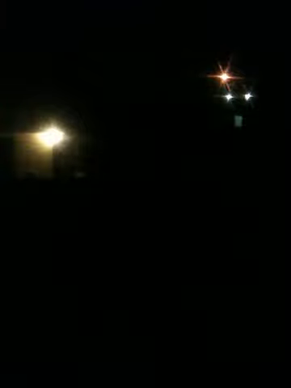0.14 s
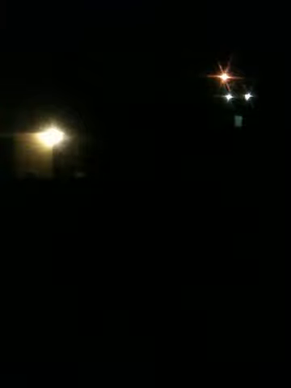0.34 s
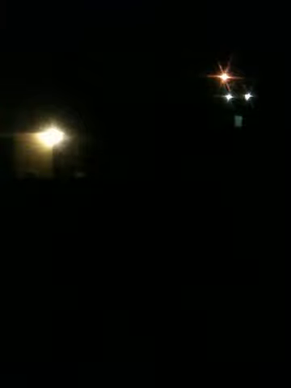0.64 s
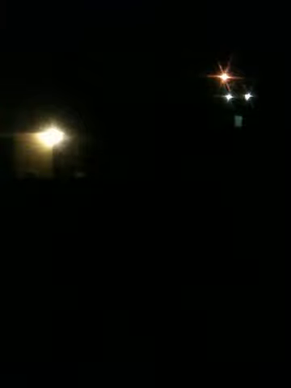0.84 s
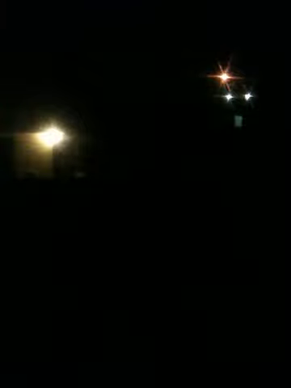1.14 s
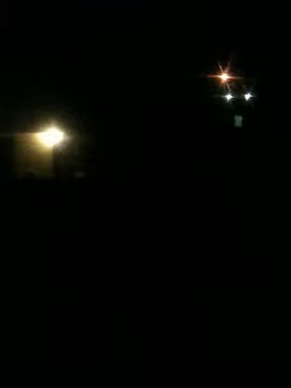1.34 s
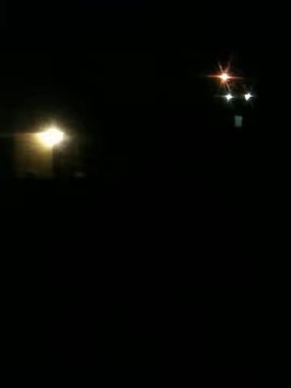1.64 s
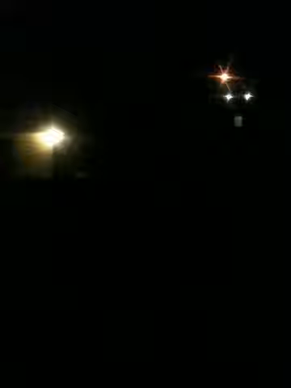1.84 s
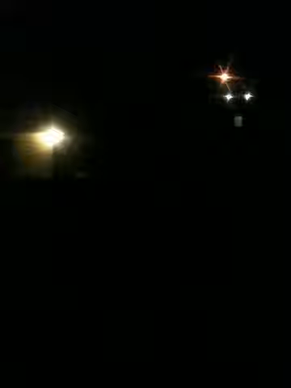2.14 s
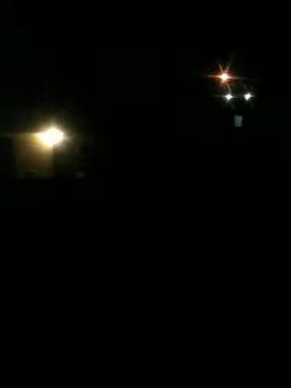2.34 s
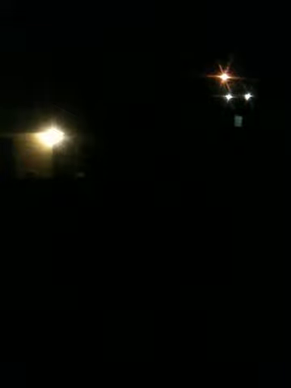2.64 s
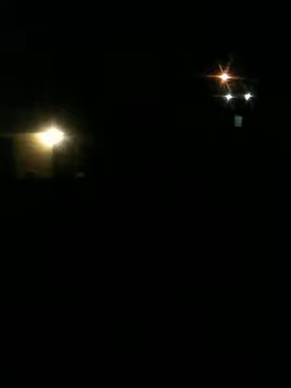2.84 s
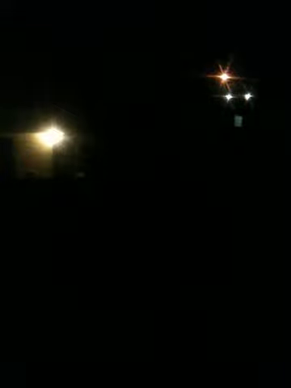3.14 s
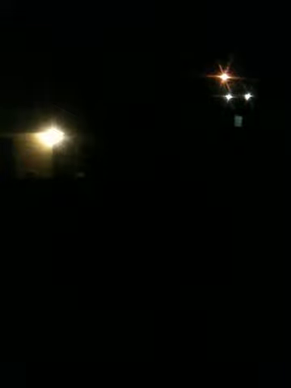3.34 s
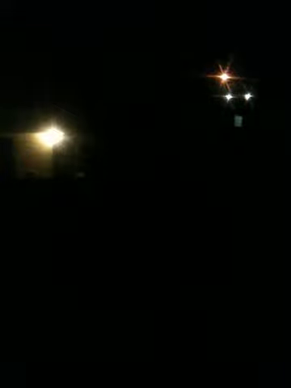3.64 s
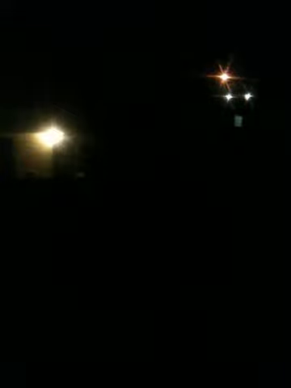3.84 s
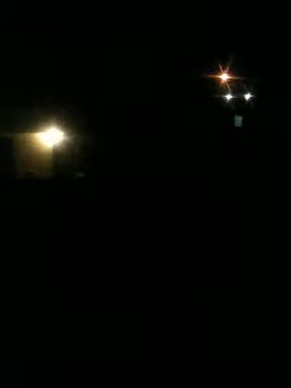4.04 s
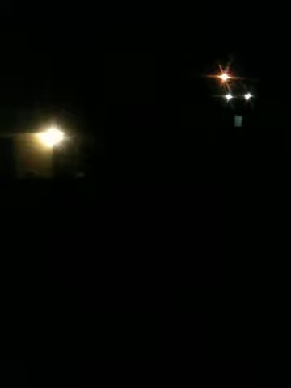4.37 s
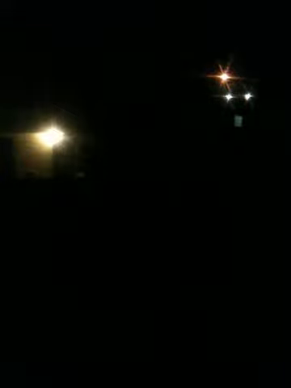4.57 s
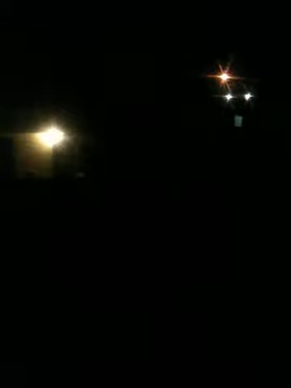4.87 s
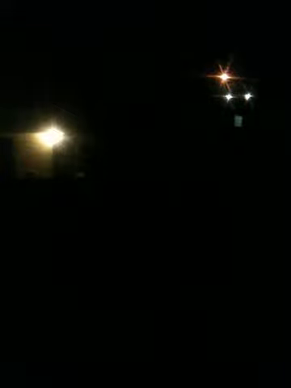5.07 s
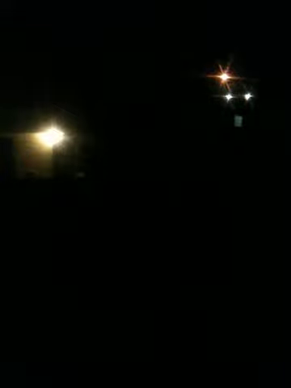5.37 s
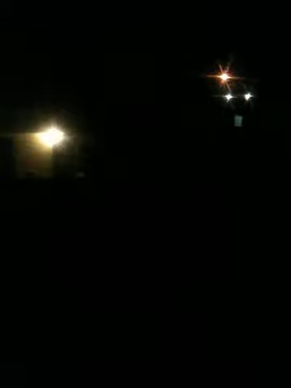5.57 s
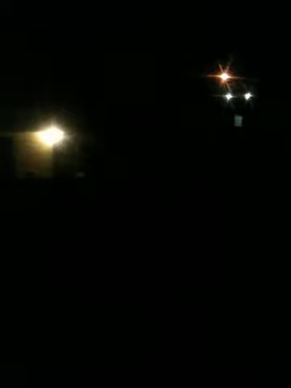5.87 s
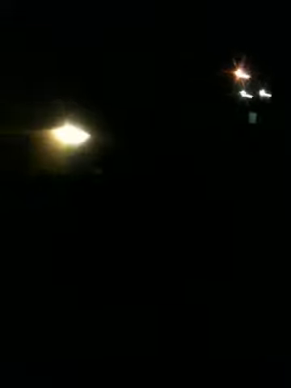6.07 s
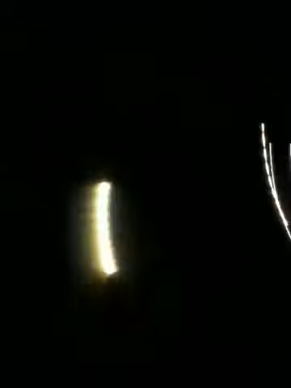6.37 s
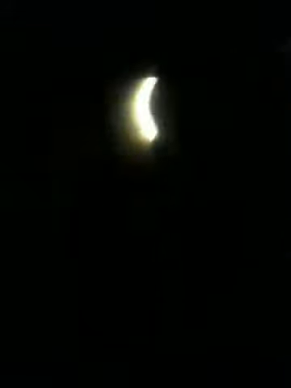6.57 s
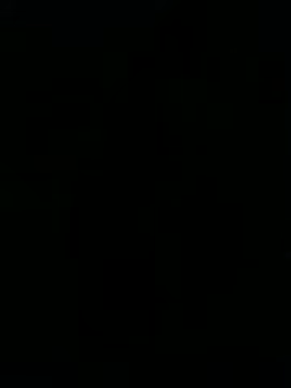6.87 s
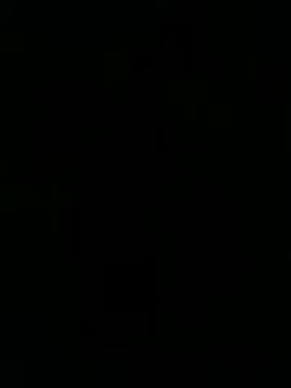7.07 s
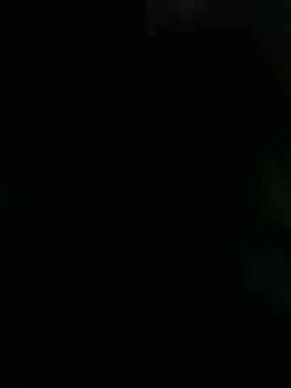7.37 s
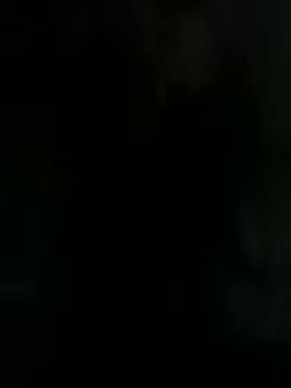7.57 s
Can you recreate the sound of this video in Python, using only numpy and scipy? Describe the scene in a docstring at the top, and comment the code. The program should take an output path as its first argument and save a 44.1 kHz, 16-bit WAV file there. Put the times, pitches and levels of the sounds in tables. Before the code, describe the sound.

Quiet night ambience with a low distant traffic drone, a thin insect chorus and a barely audible high whine. A bird's clear, quick whistles come in repeated groups with short wall echoes and a sparse tail. Light taps creep in near the end of the song, then close handling noise takes over: scuffing, one overloaded plastic knock, lighter taps and a muffled long rustle on the microphone.

```python
"""A mockingbird sings at night some way off: quick whistled strokes and a few buzzes, thrown back by walls.
Each stroke is a near sine that follows a drawn pitch path; the walls are single echoes and a sparse tail.
A camera ticks faintly and whines thinly. Near the end a hand takes it up: scuffs and taps of filtered
noise and ringing tones, one hard knock, and a long rustle.
Behind it all lie far traffic, made of patchy noise with a drone, and insects, made of narrow noise bands."""
import sys
import numpy as np
from scipy import signal
from scipy.io import wavfile
from scipy.ndimage import uniform_filter1d

SR = 44100
rng = np.random.default_rng(int(sys.argv[2]) if len(sys.argv) > 2 else 0)


def wav_record(signal):
    """Record a signal, one row per channel, as 16-bit PCM in the file named by sys.argv[1]."""
    frames = np.transpose(np.atleast_2d(signal))
    bounded = np.clip(frames, -1, 1)
    # unit amplitude maps onto the largest positive 16-bit level
    quanta = np.round(bounded * 32767).astype(np.int16)
    wavfile.write(sys.argv[1], SR, quanta)


N = 340011


def bird():
    """The voice is close to one pure tone: whistles glide along a path, buzzes shake their pitch fast."""
    return whistles() + buzzes()


def whistles():
    """A sine follows the pitch of each stroke, and its loudness trembles most where the pitch sweeps fast."""
    # the bird's syllables by name, each a list of strokes (the last in "chip" is its high echo off a wall),
    # each stroke a path of points: after_start_s, pitch_hz, level_db (against the syllable's level)
    syllables = { "swoop": [[(-.004, 3520, -15), (.002, 3300, -9), (.008, 2810, -6), (.018, 2924, -2),
                 (.032, 3060, -.5), (.047, 3130, -6), (.062, 3230, -7.5), (.076, 3190, -8),
                 (.088, 2900, -14)]], "hook": [[(0, 2680, -16), (.016, 3010, -3), (.025, 3130, -10),
                 (.032, 3310, 0.5), (.04, 3390, -4)], [(.034, 3255, -7), (.046, 2785, -2), (.059, 2740, -8),
                 (.072, 2760, -20)]], "scoop": [[(0, 2070, -18), (.008, 2093, -6), (.016, 2110, -12)],
                 [(.016, 2240, -10), (.024, 2390, -3.5), (.036, 2492, -1.5), (.05, 2565, -.5),
                 (.062, 2567, -6.5), (.074, 2550, -12)]], "pip": [[(0, 2900, -14), (.005, 3020, -9),
                 (.014, 3167, -16), (.023, 3320, -.5), (.034, 3310, -4), (.044, 3270, -11)]],
                 "chip": [[(-.002, 4250, -15), (.004, 4000, -9), (.008, 3750, -11), (.012, 3500, -13)],
                 [(.014, 4080, -18), (.019, 3900, -14), (.026, 3650, -19)], [(.011, 3520, -7),
                 (.015, 3380, 0.5), (.019, 3250, -8), (.022, 3180, -1), (.025, 3080, -6),
                 (.028, 3030, -1.5), (.033, 2900, -10)], [(.032, 4050, -17), (.038, 3880, -12),
                 (.045, 3650, -17)]], "flick": [[(.006, 3650, -14), (.015, 3380, -1.5), (.022, 3180, -3),
                 (.033, 2800, -8)]], "arch": [[(0, 2720, -19), (.013, 3010, -9.5), (.025, 3096, -7.5),
                 (.037, 2984, -10), (.05, 2650, -16)], [(.057, 2594, -13), (.076, 2676, -7.5),
                 (.095, 2800, -1.5), (.106, 2900, -2.5), (.118, 2990, -8.5), (.13, 2960, -19)]],
                 "slide": [[(0, 2802, -16), (.012, 2790, -8.5), (.024, 2740, -7), (.036, 2540, -3),
                 (.054, 2410, -.5), (.068, 2330, -3), (.078, 2363, -6), (.088, 2600, -7)]],
                 "dot": [[(0, 2400, -9), (.006, 2370, -2.5), (.016, 2350, -1), (.028, 2350, -11)]],
                 "warble": [[(-.003, 2996, -14), (.005, 3010, -6), (.012, 2955, -1), (.021, 2740, -5)],
                 [(.02, 3050, -14), (.026, 3400, -5), (.031, 3470, -9.5), (.036, 3350, -17)],
                 [(.037, 3110, -8), (.042, 3015, -1), (.048, 2923, -0.5), (.056, 2820, -2.5),
                 (.067, 2680, -8)]], "twirl": [[(-.003, 2980, -14), (.005, 2960, -4), (.013, 2876, -1),
                 (.021, 2720, -7)], [(.018, 3050, -13), (.026, 3380, -8), (.033, 3650, -14),
                 (.041, 3600, -19)], [(.037, 3060, -10), (.042, 2992, -3), (.05, 2904, -1),
                 (.058, 2800, -3), (.068, 2690, -8)]], "murmur": [[(-.004, 2300, -6), (.012, 2280, -2),
                 (.04, 2280, -1.5), (.056, 2300, -6)], [(.053, 2600, -11), (.065, 2460, -3),
                 (.073, 2900, 1.5), (.087, 3150, 5)]], }
    # the song: syllable, start_s, length_ratio and pitch_ratio (times the pattern), level_db
    song = [ ("swoop", .91, 0.92, 1.001, -41.5), ("hook", 1.005, 1.001, 1, -42.5),
            ("swoop", 1.278, 1.001, 1, -43), ("hook", 1.373, 1.001, 1.01, -43),
            ("scoop", 1.891, .99, .99, -46), ("pip", 1.967, 1.01, 1.005, -43),
            ("chip", 2.008, 1.001, 1.01, -48), ("scoop", 2.121, 0.99, .99, -46),
            ("pip", 2.199, 1.001, .99, -45), ("flick", 2.244, 1.001, 0.96, -48.5),
            ("scoop", 2.351, .99, .995, -45.5), ("pip", 2.433, 1.001, 1.005, -44),
            ("chip", 2.474, 1.001, 1.01, -48.5), ("scoop", 2.589, 1.001, 1.001, -44),
            ("pip", 2.667, 1.06, 1.001, -44), ("chip", 2.712, 1.001, 1, -46),
            ("scoop", 2.844, 1.001, 1.015, -42.5), ("pip", 2.928, 1.001, 0.99, -48),
            ("chip", 2.969, 1.1, .99, -44.5), ("scoop", 3.136, 1.001, 1.01, -43.5),
            ("pip", 3.218, 1.001, 1.001, -46), ("chip", 3.261, 1.001, 1.005, -46.5),
            ("arch", 3.49, .98, .999, -41.5), ("slide", 3.65, 0.95, 1.005, -47),
            ("dot", 3.74, 0.97, 1.01, -48), ("arch", 3.83, 1, 1.01, -41),
            ("slide", 4.002, 1.22, .985, -48.5), ("dot", 4.112, 1.1, 1, -56),
            ("warble", 4.222, 1.001, .99, -41.5), ("twirl", 4.312, .99, 0.99, -41.5),
            ("arch", 4.771, 1.02, .995, -42), ("slide", 4.935, 1.02, .999, -47.5),
            ("dot", 5.032, 1, .999, -48), ("arch", 5.126, 1.01, .999, -43),
            ("slide", 5.297, 1.01, 1.005, -46), ("dot", 5.402, 1.3, 1.001, -49.5),
            ("warble", 5.496, 1.02, 1.025, -40), ("twirl", 5.59, 1.001, 1.005, -42),
            ("murmur", 6.345, 1.001, 1.001, -59), ("dot", 6.822, 1.001, 1.15, -57), ]
    steady_flutter_db, sweep_flutter_db, bead_db = 0.75, 2.5, 2.6
    out = np.zeros(N)
    for name, start_s, length_ratio, pitch_ratio, level_db in song:
        for points in syllables[name]:
            t, (pitch_hz, db) = spread(np.array(points) * [length_ratio, pitch_ratio, 1])
            pitch_hz = uniform_filter1d(pitch_hz, size=200, mode="nearest")
            glide = np.clip(abs(np.gradient(pitch_hz)), 0, 1)  # Hz a sample
            flutter_db = steady_flutter_db + sweep_flutter_db * glide  # the voice breaks up in fast sweeps
            beads_db = bead_db * wander(len(t), size=170)  # the breath comes in beads
            loudness_db = level_db + db + beads_db + flutter_db * wander(len(t), size=70)
            tone = np.sin(2 * np.pi * np.cumsum(pitch_hz) / SR) * amp(loudness_db)
            add(out, start_s + t[0], tone * signal.windows.tukey(len(t), .15))
    return out


def buzzes():
    """A buzz is a whistle whose pitch dips fast and often, deeper with effort."""
    # buzzy notes: loudest_s, rise_s, fall_s, level_db, top_hz, deepest_dip_hz
    buzz_notes = [(.004, .004, 0.16, -55, 3430, 330), (.318, .085, .062, -44.5, 3460, 380),
                  (.495, .066, 0.084, -44, 3430, 460)]
    mean_shake_hz, edge_db, curve = 116, -21.5, 1.59  # level at both ends; how long the top holds
    out = np.zeros(N)
    for loudest_s, rise_s, fall_s, level_db, top_hz, dip_hz in buzz_notes:
        effort_db = swell(rise_s, fall_s, edge_db, curve)
        count = len(effort_db)
        db = level_db + effort_db + 2.0 * wander(count, size=250)
        shake_hz = mean_shake_hz * (1 + 0.26 * wander(count, size=300))
        shake = np.sin(2 * np.pi * np.cumsum(shake_hz) / SR)
        depth_hz = dip_hz * (.45 + 0.552 * amp(effort_db))
        pitch_hz = top_hz - depth_hz * (1 - shake) / 2
        tone = np.sin(2 * np.pi * np.cumsum(pitch_hz) / SR) * (1 + 0.23 * shake)
        add(out, max(loudest_s - rise_s, 0), amp(db) * tone * signal.windows.tukey(count, .1))
    return out


def yard(x):
    """Walls return single smeared echoes, and many weak reflections make a sparse dying tail."""
    # delays of the walls: delay_s
    echo_s = [.011, .0175, .024, .0335, .072, .165]
    # strengths of those echoes against the direct sound: level_db
    echo_db = [-10, -13, -13, -9, -16.5, -24]
    tail_db, tail_t60_s, build_up_s = -7.5, .95, .025  # t60: time to fall by 60 dB
    response, t = np.zeros(SR), np.arange(SR) / SR
    at = np.arange(200, SR - 22, 22)
    at = at + rng.integers(0, 22, len(at))  # one reflection somewhere in every 22 samples
    response[at] = rng.choice([-1., 1.], len(at))
    response *= amp(-60 * t / tail_t60_s) * (1 - np.exp(-t / build_up_s))
    response *= amp(tail_db) / np.linalg.norm(response)
    for delay_s, db in zip(echo_s, echo_db):
        rough = amp(-14.5 - .05 * np.arange(200)) * rng.standard_normal(200)  # an uneven wall smears its echo
        rough[0] = 2
        add(response, delay_s, amp(db) * rough / np.linalg.norm(rough))
    return x + signal.fftconvolve(x, response)[:N]


def knocks():
    """Taps set the shell ringing; soft bumps and a squeak join them."""
    return taps() + thumps()


def taps():
    """A blow and a short scrape ring the shell at its own pitches, each dying at its own pace."""
    # taps on the shell: start_s, level_db (peak of the plain ring), tilt_db (an octave, about 2000 Hz),
    # scrape_db (against the blow), scrape_s (how fast the scrape dies)
    tap_list = [(4.613, -44, -3.5, -13, .002), (4.687, -46, 0, -10, .003), (4.709, -46, -6, -14, .002),
                (4.847, -50, 5, -18, .001), (5.07, -48, 8, -20, .002), (6.05, -32, 1, -16, 0.0028),
                (6.09, -35, 13, -22, .002), (6.169, -2.5, -6, -23, 0.0027), (6.1708, -11, -8, -24, .002),
                (6.1728, -3.5, -6, -15.5, 0.0023), (6.1755, -12, -5, -30, 0.011),
                (6.18, -22, -5, -19, 0.0037), (6.1894, 1.5, 2, -16, 0.002), (6.191, 5, 4.5, -19.5, 0.0017),
                (6.1925, -7.5, -1, -14.5, 0.0031), (6.248, -26, 4, -21, .002),
                (6.2494, -11.5, 7, -38, 0.0015), (6.303, -27, 7.5, -51, .002), (6.466, -33, 2.5, -7, 0.006),
                (6.5708, -36, 1.5, -15, 0.003), (6.6655, -20, 2.5, -22, .0006), (6.696, -36, 6, -13, .003),
                (6.7378, -33, 0, -10, 0.003), (6.743, -34, 1, -16, .0015), (6.74, -43, 4, -12, 0.0022),
                (6.775, -37, -2, -13, .002), (6.8074, -26, 1, -26, 0.0008), (6.9225, -33, -4.5, -16, .002),
                (6.928, -28, 6, -32, .001), (7.425, -52, 4, -12, .002), (7.52, -54, 2, -14, .002),
                (7.568, -40.5, -4, -28, 0.0009)]
    # ringing pitches of the shell: pitch_hz, level_db, t60_s (time to fall by 60 dB, ungripped)
    shell = [(269, -32, 0.03), (460, -8, 0.009), (597, 0, 0.014), (970, -1.5, 0.015), (1445, 12, 0.0052),
             (1800, 5, 0.011), (2140, 1, .008), (2710, -10, 0.013), (3700, 0.5, 0.0055), (4310, 2.5, .007),
             (5800, 9, 0.0027), (7300, 8.5, 0.0038), (8100, 10.5, 0.0025), (10220, 10, 0.0019),
             (13400, -23.5, 0.0025)]
    grip_s, grip_ring = 6.4, .4  # once the hand closes on the shell, taps ring this share as long
    cut_hz = 157  # taps on so light a shell carry little under this
    out, t = np.zeros(N), np.arange(3000) / SR
    for start_s, level_db, tilt_db, scrape_db, scrape_s in tap_list:
        blow = amp(scrape_db) * rng.standard_normal(len(t)) * np.exp(-t / max(scrape_s, .0002))
        blow[0] = -1
        ring_share = grip_ring if start_s > grip_s else 1
        ring = np.zeros(len(t))
        for hz, mode_db, t60_s in shell:
            db = mode_db + tilt_db * np.log2(hz / 2000) - 60 * t / (t60_s * ring_share)
            ring += amp(db) * np.sin(2 * np.pi * hz * t)
        struck = signal.fftconvolve(blow, ring)[:len(t)]
        add(out, start_s, amp(level_db) * struck / abs(ring).max())
    return signal.sosfilt(signal.butter(2, cut_hz, "high", fs=SR, output="sos"), out)


def thumps():
    """A soft bump or squeak is one tone that swells quickly and dies."""
    # bumps and a squeak: start_s, level_db, pitch_hz, t60_s (time to fall by 60 dB)
    bumps = [(0.95, -27.5, 199, 0.064), (0.975, -30, 225, 0.074), (6.097, -36, 300, 0.0645),
             (6.298, -38, 520, 0.032), (6.482, -38, 1634, 0.066), (7.084, -40, 472, 0.055),
             (7.094, -32, 169, 0.071), (7.116, -39, 268, 0.075)]
    out, t = np.zeros(N), np.arange(8000) / SR
    for start_s, level_db, hz, t60_s in bumps:
        envelope = amp(level_db - 60 * t / t60_s) * (1 - np.exp(-t / 0.00085))
        add(out, start_s, envelope * np.sin(2 * np.pi * hz * t))
    return out


def rubbing():
    """A moving hand makes short scuffs of noise that swell and sink, and one long rustle."""
    # scuffs: loudest_s, rise_s, fall_s, level_db, treble_db and bass_db (both against the level)
    scuffs = [ (4.362, .05, 0.072, -52.5, -11, -1), (4.61, .008, .08, -61, -5, -14),
              (4.695, .01, .09, -58, -3, -12), (4.76, .09, .2, -59.5, -3, -14),
              (5.045, .006, .03, -55, -15, -15), (5.068, .012, .08, -61, -4, -16),
              (5.738, .15, .08, -65.5, 2, -14), (5.88, .04, .06, -62, -1, -14),
              (5.988, .045, 0.037, -44, -11, -16), (6.051, .04, 0.041, -42, -12, -5.5),
              (6.09, .025, 0.026, -43.5, -4, -18), (6.126, .008, .03, -37, -6, -21),
              (6.137, .02, .035, -32, -7, -21), (6.182, .012, 0.013, -33, -16, -20),
              (6.195, .003, 0.011, -23.5, -14, -16), (6.205, .01, .055, -33, -5.5, -13),
              (6.249, .008, .014, -38.5, 2, -16), (6.3, .15, .006, -49.5, 3, -15),
              (6.33, .04, .1, -70.5, 6.5, -17), (6.385, .035, 0.16, -65.5, 10.5, -17),
              (6.469, .003, .02, -35, -6, -28), (6.495, .03, .04, -51.5, -2, -20),
              (6.503, .04, 0.029, -49.5, 7.5, -18), (6.57, .12, .03, -55.5, 1, -14),
              (6.645, .14, .05, -51.5, 7, -5), (6.695, .03, 0.075, -52, 4, -11),
              (6.739, .01, .02, -38, -18, -21), (6.762, .035, .025, -46, -22, -18),
              (6.776, .01, .006, -43, -20, -14), (6.808, .04, 0.013, -49.5, -20, -15), ]
    # path of the long rustle: time_s, level_db, treble_db and bass_db (both against the level)
    rustle = [(6.815, -58, -6, -8), (6.91, -49, -4, -15), (6.925, -43.5, 0, -10), (6.981, -45.5, 9.5, -45),
              (7.071, -41, -2.5, -16), (7.221, -46.5, 6, -21), (7.359, -62, -3.5, -14),
              (7.44, -68, 0.5, -20), (7.69, -72.5, 4, -17)]
    edge_db, curve = -19, 1.2  # level at both ends; how long the top holds
    out = np.zeros(N)
    for loudest_s, rise_s, fall_s, level_db, treble_db, bass_db in scuffs:
        db = level_db + swell(rise_s, fall_s, edge_db, curve)
        add(out, loudest_s - rise_s, rub(db, treble_db, bass_db))
    t, (level_db, treble_db, bass_db) = spread(rustle)
    add(out, t[0], rub(level_db, treble_db, bass_db))
    return patchy(out)


def rub(db, treble_db, bass_db):
    """Skin and cloth slip in tiny steps: noise that passes the broad resonances of the shell."""
    # main resonances: centre_hz, width_hz (of each of two passes), level_db
    body_bands = [(1003, 350, 11), (2200, 2100, 15.5), (4250, 2700, 12.5)]
    # treble resonances: centre_hz, width_hz (of each of two passes), level_db
    sheen_bands = [(5000, 1500, 4), (6440, 660, 9), (7760, 6300, 15), (8500, 640, 5), (10730, 1300, 7),
                   (14000, 2000, -14.5)]
    slips = rng.standard_normal((3, len(db)))
    slips *= amp(2.2 * wander(len(db), size=30) + 0.75 * wander(len(db), size=400))
    body = sum(amp(g) * resonate_twice(slips[0], hz, width) for hz, width, g in body_bands)
    sheen = sum(amp(g) * resonate_twice(slips[1], hz, width) for hz, width, g in sheen_bands)
    bass = resonate_twice(slips[2], 350, 500)
    return amp(db) * (evened(body) + amp(treble_db) * evened(sheen) + amp(bass_db) * evened(bass))


def patchy(x):
    """The colour shifts as the contact moves: random patches of some 1500 Hz by 25 ms."""
    patch_db = 1.5
    spectrum = signal.stft(x, nperseg=256, noverlap=192)[2]
    patches = rng.standard_normal(spectrum.shape)
    patches = uniform_filter1d(patches, size=9, axis=0)  # along pitch
    patches = evened(uniform_filter1d(patches, size=16, axis=1))  # along time
    return signal.istft(spectrum * amp(patch_db * patches - 0.77), nperseg=256, noverlap=192)[1][:len(x)]


def camera():
    """Thin steady electric tones are sines; the regular treble tick is a tiny burst through a resonance."""
    # electric tones: pitch_hz, level_db (rms)
    whine = [(14971, -94), (15030, -94)]
    first_s, gap_s, end_s = .0893, .1024, 1.85
    tick_drive_db = -65  # sets the tick's strength before the resonance and its gain
    t, tones = np.arange(N) / SR, np.zeros(N)
    for hz, db in whine:
        tones += np.sqrt(2) * amp(db) * np.sin(2 * np.pi * hz * t)
    clicks = np.zeros(N)
    at = np.arange(first_s, end_s, gap_s)
    clicks[(at * SR).astype(int)] = amp(tick_drive_db + 1.0 * rng.standard_normal(len(at)))
    burst = rng.standard_normal(130) * amp(-.25 * np.arange(130))
    ticks = signal.oaconvolve(clicks, burst)[:N]
    return tones + 4 * resonate(ticks, 12000, 4500)


def night():
    """Far traffic and its drone, a late faint hiss, and insects, each with its own path of loudness."""
    # traffic as the microphone is turned and covered: time_s, level_db (before a 0.5 dB lift)
    traffic_path = [(0, -54), (5.5, -54.5), (6.18, -52), (6.31, -53), (6.46, -58.5), (6.96, -57.5),
                    (7.09, -50), (7.28, -59), (7.39, -63), (7.71, -63.5)]
    # far machines: pitch_hz, width_hz (of each of two passes), level_db (against the traffic noise)
    drone = [(240.6, 21, -7.5), (184.5, 42, -14)]
    # a faint hiss near 2.5 kHz that joins the fading end of the rustle:
    # pitch_hz, width_hz (of each of two passes), level_db (against its path)
    hiss = [(2500, 1300, 0)]
    # loudness of the hiss: time_s, level_db
    hiss_path = [(0, -110), (7.1, -110), (7.3, -63), (7.45, -68), (7.71, -68.5)]
    # insects: pitch_hz, width_hz (of each of two passes), level_db (against the chorus path)
    insects = [(5765, 57, 1), (5885, 110, 2), (6070, 78, 1), (6200, 60, -13)]
    # the chorus drops away while a hand covers the microphone: time_s, level_db
    chorus_path = [(0, -76), (5.9, -75.5), (6.2, -81), (6.3, -96), (6.45, -94), (6.6, -78), (6.8, -73),
                   (7.3, -73), (7.45, -78), (7.71, -84)]
    far = (traffic_wash() + fuzzy(drone, 2.36, size=3000)) * amp(0.5 + level_path(traffic_path))
    far += fuzzy(hiss, 1.3, size=2000) * amp(level_path(hiss_path))
    return far + fuzzy(insects, 2.5, size=500) * amp(level_path(chorus_path))


def traffic_wash():
    """Distance blurs traffic into coloured noise whose spectrum comes and goes in soft patches."""
    # colour of the night: pitch_hz, level_db (per Hz, only the shape counts)
    colour = [(35, -83), (60, -30), (236, -2.5), (278, -9), (413, -12), (453, -9), (1630, -21), (1910, -20),
              (2310, -23), (3340, -29.5), (4220, -29), (5450, -33), (5980, -30.5), (7030, -34),
              (15500, -44.5)]
    frames, hz = N // 256 + 5, np.fft.rfftfreq(1024, 1 / SR)
    real, imaginary, patches = rng.standard_normal((frames, 513, 3)).T
    patches = uniform_filter1d(patches, size=10, axis=0)  # along pitch
    patches = evened(uniform_filter1d(patches, size=10, axis=1))  # along time
    f, db = np.transpose(colour)
    colour_db = np.interp(np.log(hz + 1), np.log(f + 1), db)[:, None]
    spectrum = (real + 1j * imaginary) * amp(colour_db + 1.4 * patches)
    return evened(signal.istft(spectrum, nperseg=1024, noverlap=768)[1][:N])


def fuzzy(lines, swell_db, size):
    """Noise through narrow resonances makes blurred tones, each wavering in level."""
    out = np.zeros(N)
    for hz, width, db in lines:
        waver = amp(db + swell_db * wander(N, size=size))
        out += waver * evened(resonate_twice(rng.standard_normal(N), hz, width))
    return out


def level_path(points):
    """Straight lines between (time_s, level_db) points, over the whole sound."""
    return np.interp(np.arange(N) / SR, *np.transpose(points))


def amp(db):
    """Gain of a dB value."""
    return 10 ** (np.asarray(db) / 20)


def evened(x):
    """Scaled to rms 1."""
    return x / np.sqrt(np.mean(x ** 2) + 1e-20)


def add(mix, s, sound):
    """Mixes a sound in at s seconds."""
    part = mix[round(s * SR):][:len(sound)]
    part += sound[:len(part)]


def spread(rows):
    """Time axis of a table, and its other columns drawn as straight lines between the rows."""
    s, *columns = np.transpose(rows)
    t = np.arange(s[0], s[-1], 1 / SR)
    return t, [np.interp(t, s, c) for c in columns]


def swell(rise, fall, edge_db, curve):
    """A dB shape that climbs from edge_db to zero and sinks back; rise and fall in seconds."""
    rise, fall = max(rise, .002), max(fall, .002)
    t = np.arange(-rise, fall, 1 / SR)
    return edge_db * np.where(t < 0, -t / rise, t / fall) ** curve


def resonate(x, hz, width):
    """One resonance of gain 1: it favours pitches near hz, and a smaller width rings longer."""
    r = np.exp(-np.pi * width / SR)
    return 2 * signal.lfilter([1 - r], [1, -r * np.exp(2j * np.pi * hz / SR)], x).real


def resonate_twice(x, hz, width):
    """The same resonance two times over, for steeper sides."""
    return resonate(resonate(x, hz, width), hz, width)


def wander(count, size):
    """Smooth random ups and downs of rms 1; size is the smoothing in samples."""
    return evened(uniform_filter1d(uniform_filter1d(rng.standard_normal(count), size), size))


def scene():
    """Outdoor sounds, then the camera and what touches it; the small shell carries no deep bass."""
    bass_cut_hz = 140
    touch = signal.sosfilt(signal.butter(3, bass_cut_hz, "high", fs=SR, output="sos"), rubbing() + knocks())
    return (night() + yard(bird()) + camera() + touch)[None]


def record(dry):
    """The microphone thins the bass, the amplifier squashes loud peaks, and the top treble is cut."""
    mic_cut_hz, treble_cut_hz = 85, 16300
    ceiling = .72  # largest swing the amplifier passes; the hard knock overloads it
    end_s = 7.692  # the sound stops here, just before the end
    thin = signal.sosfilt(signal.butter(2, mic_cut_hz, "high", fs=SR, output="sos"), dry)
    running = np.clip((end_s - np.arange(N) / SR) / .002, 0, 1)
    squeezed = ceiling * np.tanh(thin / ceiling) * running
    band_limit = signal.firwin(511, treble_cut_hz, window=("kaiser", 9), fs=SR)
    return signal.oaconvolve(squeezed, band_limit[None], "same")


dry = scene()
out = record(dry)
wav_record(out)
```